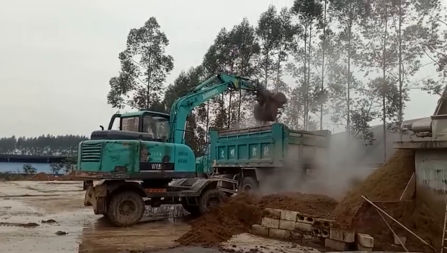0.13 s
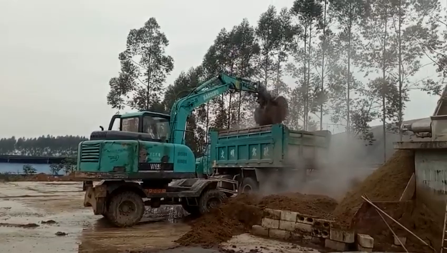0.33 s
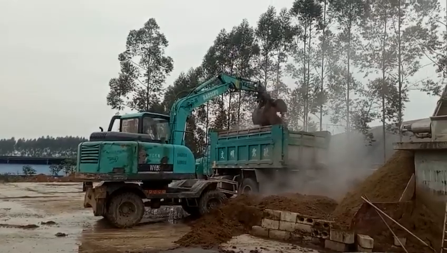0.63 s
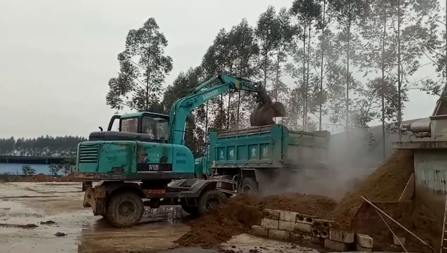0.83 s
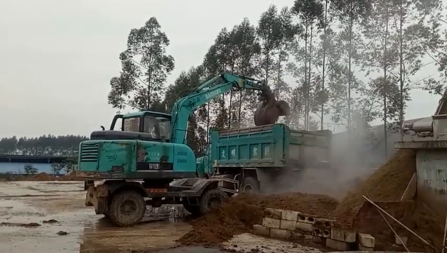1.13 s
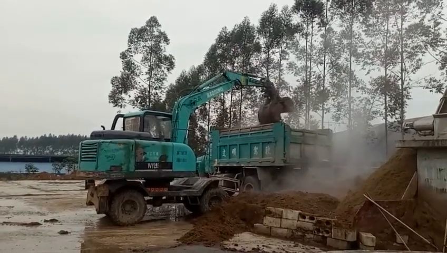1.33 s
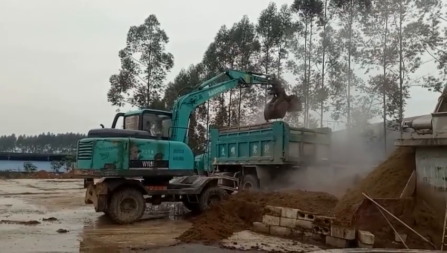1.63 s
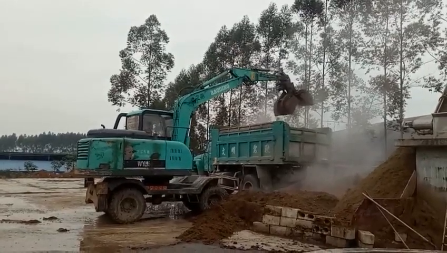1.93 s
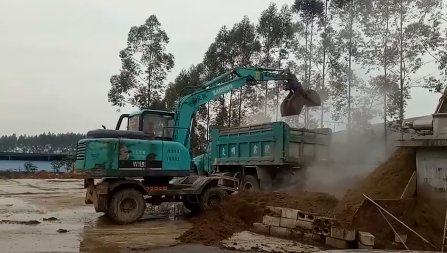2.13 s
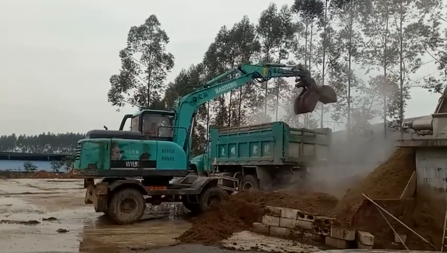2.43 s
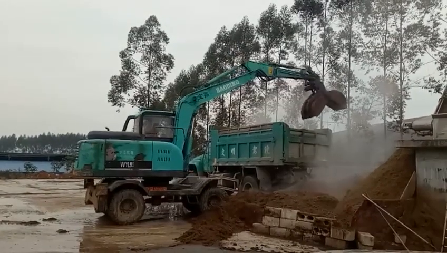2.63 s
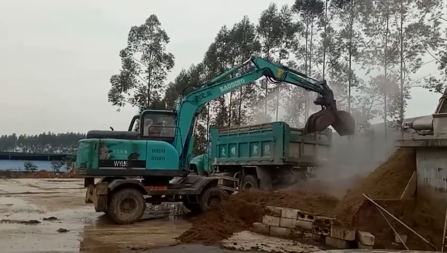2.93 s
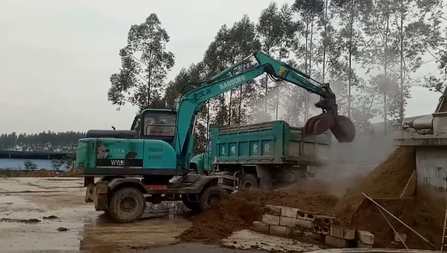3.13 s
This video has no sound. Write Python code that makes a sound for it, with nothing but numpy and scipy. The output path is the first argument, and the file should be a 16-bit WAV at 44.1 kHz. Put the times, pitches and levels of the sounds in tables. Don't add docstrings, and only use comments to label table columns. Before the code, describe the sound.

Steady excavator diesel clatter and low rumble outdoors, heard on a phone from about twenty metres. Pitch sags slightly under load after an early clank, rises again past two seconds, then the grab clanks.

```python
import sys
import numpy as np
from scipy import signal
from scipy.fft import rfft, irfft
from scipy.io import wavfile
from scipy.ndimage import uniform_filter1d

SR = 44100
rng = np.random.default_rng(int(sys.argv[2]) if len(sys.argv) > 2 else 0)


def gain_from_db(level_db):
    decades = np.asarray(level_db, float) / 20
    return 10 ** decades


def transcribe(signal):
    frames = np.atleast_2d(signal).T
    limited = np.clip(frames, -1, 1)
    pcm = np.round(limited * 32767).astype(np.int16)
    wavfile.write(sys.argv[1], SR, pcm)


N = 145530
t = np.arange(N) / SR
f = np.maximum(np.fft.rfftfreq(N, 1 / SR), 1)

# time in seconds, engine cycles per second above the loaded speed in Hz,
# hydraulic load 0-1, pump stroke in dB.
WORK = [(0, .5, 0, 0.5), (0.282, 0.91, 0.47, -1), (.36, .1, 0.7, -4), (.42, 0.022, 0.99, -1.5),
        (1.097, 0.0015, 0.92, -0.5), (1.45, 0.00081, 0.89, -1.5), (2.031, 0.0046, 1, -4.5),
        (2.199, 0.56, 0, -2.5), (2.698, .82, 0.22, 4), (2.801, .6, 0, -17), (2.971, 0.74, 0.06, -9.5),
        (3.15, 0.96, 0, 3), (3.3, 0.9, 0.7, -0.5)]
LOADED_HZ = 12.172

EXHAUST_ORDERS = [4, 8, 9, 10, 12, 13, 14, 15, 16, 17, 19, 20, 21, 22, 23, 24, 25, 26, 28, 30, 32, 34, 42,
                  48, 60]
# level idle in dB, level loaded in dB.
EXHAUST_LEVELS = [(-47, -45), (-34, -35), (-35, -34), (-36, -43), (-45, -39), (-46, -39), (-48, -48),
                  (-46, -40), (-35, -50), (-46, -43), (-39, -42), (-35, -38), (-46, -46), (-38, -50),
                  (-38, -40), (-45, -31), (-45, -31), (-39, -46), (-40, -50), (-46, -40), (-39, -42),
                  (-48, -44), (-48, -42), (-48, -41), (-48, -40)]
FAN_ORDER, FAN_IDLE_DB, FAN_LOADED_DB = 10.36, -25, -31

GEAR_ORDERS = [80, 84, 85, 86, 87, 88, 90, 91, 92, 93, 97, 99]
# level idle in dB, level loaded in dB.
GEAR_LEVELS = [(-41, -44), (-42, -52), (-50, -42), (-40, -50), (-38, -41), (-36, -50), (-50, -34),
               (-50, -44), (-50, -32.5), (-50, -48), (-50, -41), (-50, -42)]

PUMP_ORDERS = [18, 36, 54]
# level idle in dB, level loaded in dB.
PUMP_LEVELS = [(-27, -27), (-42, -36), (-46, -32)]
# time in seconds, second pump harmonic in dB,
# third pump harmonic in dB, gear mesh in dB.
VALVE_MOVES = [(0, 0, 0, 0), (.28, 0, 0, 0), (.33, 7, 0, 0), (.45, 1, 1, 1), (.8, -1, 0, 1),
               (1.0, -5, 2, 0), (1.12, -7, -9, 1), (1.42, -8, -6, 1), (1.52, 1, -2, -7), (1.8, 1, -7, -7),
               (2.05, 3, -6, -7), (2.2, 0, 0, 0), (3.3, 0, 0, 0)]
WAVER_DB, WAVER_PER_S = 1.2, 6

# place in the cycle 0-1, level in dB.
BLOWS = [
    (.24, 12.5),
    (.43, 9),
    (0.499, 11),
    (.73, 8),
    (.84, 10.5),
    (.97, 7.5),
    (0.081, 4.5),
    (.6, 4),
]
# frequency in Hz, width in Hz, level in dB.
BLOCK_MODES = [(806, 99, -13.5), (972, 40, -11), (1030, 70, -8.5), (1111, 110, -5), (1203, 89, -3.5),
               (1310, 270, -10), (1650, 60, -9), (2080, 133, -9), (4400, 400, -10.5)]
KNOCK_DB, KNOCK_SCATTER_DB, KNOCK_JITTER_S = -27.5, 1.2, .00005

# frequency in Hz, level in dB.
RATTLE_TONE = [(600, -8), (830, -10), (1150, -3), (1800, -7), (2300, -9), (3300, -14.5), (4500, -12),
               (6500, -31), (9000, -46)]
RATTLE_DB, RATTLE_FLICKER_DB = -21.5, .8
PULSE_DEPTH, PULSE_DECAY_S = .22, .014

# frequency in Hz, level in dB.
RUMBLE_TONE = [(15, -56), (25, -16), (54, -20), (119, 4), (173, -5), (227, -3.5), (487, -11.5), (657, -8),
               (900, -15.5), (1170, -37), (1980, -120)]
RUMBLE_DB, RUMBLE_FLICKER_DB = -24, 1.

# frequency in Hz, level in dB.
HISS_TONE = [(7000, -19), (7600, -26), (8200, -1.5), (11200, -4.5), (13100, 0.5), (14000, 2.5), (14800, -1),
             (15200, -17)]
HISS_DB, HISS_FLICKER_DB, HISS_LOAD_DB = -58, 3.5, 2.5

WIDE_OCT, NARROW_OCT = .7, .07
SWELL_DB, WALK_SPREAD = .3, 1.4
BYPASS_HZ, BYPASS_WIDTH_HZ, BYPASS_DB = 1614, 71, -33.5

# start in seconds, level in dB, centre in Hz, width in Hz, decay in seconds.
CLANKS = [(.1872, -9.5, 3720, 700, 0.0046), (.1885, -11, 4670, 900, .007),
          (0.1871, -2.5, 1120, 900, 0.0021), (0.189, -13, 2290, 400, 0.0054),
          (0.197, -14.5, 4250, 1500, .007), (.197, -15, 2200, 700, 0.0068), (.204, -20, 4200, 1200, 0.0067),
          (0.235, -19, 3750, 2000, 0.0073), (0.242, -14, 2490, 400, 0.0053),
          (.2445, -20, 3800, 900, 0.0083), (0.251, -16, 2530, 700, 0.0075), (0.261, -17, 2480, 500, 0.0045),
          (.275, -19, 2200, 2500, 0.0027), (.279, -20, 3650, 500, 0.01), (0.361, -20, 4200, 1400, 0.011),
          (2.698, -18, 1840, 700, 0.0098), (2.710, -24, 4700, 1200, 0.0055),
          (2.719, -16.5, 1700, 600, .006), (2.763, -17, 2000, 1200, .005),
          (2.7794, -15.5, 4150, 1980, 0.0047), (2.7825, -10.5, 3370, 1400, 0.0043),
          (2.779, -9, 930, 400, 0.005), (2.78, -14.5, 2000, 1400, .004), (2.792, -18, 4300, 2000, 0.0031),
          (2.801, -22, 1600, 700, .003), (2.8165, -26, 2800, 1800, .004), (2.837, -20, 4730, 1300, 0.0087),
          (2.839, -19, 2620, 1600, 0.01), (2.8392, -13.5, 1190, 1000, 0.0048),
          (2.848, -22, 4000, 1800, .009), (2.859, -32, 1490, 700, 0.0049), (2.77, -23.5, 566, 260, 0.045),
          (2.85, -17.5, 636, 405, 0.047), (2.89, -19, 2000, 1000, .006), (2.92, -19.5, 670, 300, 0.0088),
          (3.284, -25, 4030, 2000, 0.0066)]
CLANK_RISE_S, CLANK_ALIKE = .0006, 0.35
CLANK_LEFT_DB, CLANK_RIGHT_DB = 4.5, -8

# frequency in Hz, likeness 0-1.
PORT_LIKENESS = [(100, .98), (500, .88), (1200, .74), (2000, .45), (3200, .27), (4500, .35), (8000, .1)]
# frequency in Hz, left minus right in dB.
PORT_BALANCE = [(60, 0.5), (110, 9), (200, 8), (380, 7), (700, 5), (1290, 6.0), (2380, 6.5), (4400, 6.5),
                (8120, 2.5), (15000, 14)]
RIGHT_LAG_S, MIC_TOP_HZ = 0.00014, 7270
LIMIT_DB, RELEASE_S, DUCK = -12, .015, 34.


def curve(points, hz):
    p = np.array(points, float)
    return np.interp(np.log(hz), np.log(p[:, 0]), p[:, 1])


def level(x, db):
    return x * gain_from_db(db) / np.sqrt(np.mean(x ** 2))


def walk(rate):
    k = int(SR / rate)
    steps = rng.standard_normal(N // k + 2)
    path = np.interp(np.arange(N) / k, np.arange(len(steps)), steps)
    return WALK_SPREAD * uniform_filter1d(path, k)


def ring(x, hz, width_hz):
    return signal.lfilter(*signal.iirpeak(hz, hz / width_hz, SR), x)


def noise(points, db, flicker_db, octaves):
    spec = rfft(rng.standard_normal((2, N))) * gain_from_db(curve(points, f))
    low_hz, high_hz = points[0][0], points[-1][0]
    centres = low_hz * 2 ** np.arange(0, np.log2(high_hz / low_hz) + octaves / 2, octaves)
    out, swell = 0, SWELL_DB * walk(1.85)
    for hz in centres:
        share = np.cos(np.pi / 2 * np.clip(np.log2(f / hz) / octaves, -1, 1)) ** 2
        out = out + irfft(spec * share, N) * gain_from_db(swell + flicker_db * walk(16))
    return level(out, db)


def lines(orders, levels, turns, load):
    out = []
    for order, (idle_db, loaded_db) in zip(orders, levels):
        db = idle_db + (loaded_db - idle_db) * load + WAVER_DB * walk(WAVER_PER_S)
        phase = 2 * np.pi * (order * turns + rng.random())
        out.append(np.sqrt(2) * gain_from_db(db) * np.sin(phase))
    return np.array(out)


def valve_moves():
    s, *trims = np.array(VALVE_MOVES).T
    return [np.interp(t, s, trim) for trim in trims]


def exhaust(turns, load):
    return lines(EXHAUST_ORDERS, EXHAUST_LEVELS, turns, load).sum(0)


def fan(turns, load):
    return lines([FAN_ORDER], [(FAN_IDLE_DB, FAN_LOADED_DB)], turns, load).sum(0)


def gears(turns, load, mesh_db):
    return lines(GEAR_ORDERS, GEAR_LEVELS, turns, load).sum(0) * gain_from_db(mesh_db)


def pump(turns, load, stroke_db, second_db, third_db):
    pulses = lines(PUMP_ORDERS, PUMP_LEVELS, turns, load)
    return (pulses * gain_from_db(np.array([stroke_db, second_db, third_db]))).sum(0)


def knocks(turns):
    place, db = np.array(BLOWS).T
    at = np.arange(50)[:, None] + place
    jitter, scatter = rng.standard_normal((2, *at.shape))
    seconds = np.interp(at, turns, t, right=t[-1]) + KNOCK_JITTER_S * jitter
    i = (seconds * SR).astype(int)
    x = np.zeros(N)
    x[np.clip(i, 0, N - 1)] = gain_from_db(db + KNOCK_SCATTER_DB * scatter)
    return x


def block(blows):
    out = 0
    for k, (hz, width_hz, db) in enumerate(BLOCK_MODES):
        out = out + (-1) ** k * gain_from_db(db) * ring(blows, hz, width_hz) / np.sqrt(width_hz)
    return level(out, KNOCK_DB)


def rattle(blows):
    puff = signal.lfilter([1], [1, -np.exp(-1 / (PULSE_DECAY_S * SR))], blows)
    puff = uniform_filter1d(puff, SR // 500)
    pulse = 1 - PULSE_DEPTH + PULSE_DEPTH * puff / puff.mean()
    return noise(RATTLE_TONE, RATTLE_DB, RATTLE_FLICKER_DB, WIDE_OCT) * pulse


def rumble():
    return noise(RUMBLE_TONE, RUMBLE_DB, RUMBLE_FLICKER_DB, WIDE_OCT)


def hiss(load):
    air = noise(HISS_TONE, HISS_DB, HISS_FLICKER_DB, NARROW_OCT)
    return air * gain_from_db(HISS_LOAD_DB * load)


def bypass(load):
    jet = rng.standard_normal(N)
    for _ in range(2):
        jet = ring(jet, BYPASS_HZ, BYPASS_WIDTH_HZ)
    return level(jet, BYPASS_DB) * (1 - load)


def clanks():
    out, u = np.zeros((2, N)), t[:SR // 12]
    sides = gain_from_db(np.array([[CLANK_LEFT_DB], [CLANK_RIGHT_DB]]))
    for s, db, hz, width_hz, decay_s in CLANKS:
        crack = rng.standard_normal((2, len(u)))
        crack[1] = CLANK_ALIKE * crack[0] + np.sqrt(1 - CLANK_ALIKE ** 2) * crack[1]
        edges = [hz - width_hz / 2, hz + width_hz / 2]
        plates = signal.sosfilt(signal.butter(3, edges, "band", fs=SR, output="sos"), crack)
        shape = np.exp(-u / decay_s) * np.minimum(u / CLANK_RISE_S, 1)
        hit = plates * shape
        hit = hit * np.sqrt(np.sum(shape ** 2) / np.sum(hit ** 2, axis=1, keepdims=True))
        hit = hit * gain_from_db(db - 6.5) * sides
        i = int(s * SR)
        out[:, i:i + len(u)] += hit[:, :N - i]
    return out


def dull(x):
    return signal.sosfilt(signal.butter(8, MIC_TOP_HZ, fs=SR, output="sos"), x)


def ports(direct, around):
    pad = SR // 10
    direct_wide, around_wide = np.pad([direct, around], ((0, 0), (pad, pad)), mode="reflect")
    hz = np.maximum(np.fft.rfftfreq(len(direct_wide), 1 / SR), 1)
    alike = np.clip(curve(PORT_LIKENESS, hz), 0, .999)
    late = rfft(direct_wide) * np.exp(-2j * np.pi * hz * RIGHT_LAG_S)
    right = alike * late + np.sqrt(1 - alike ** 2) * rfft(around_wide)
    right = irfft(right * gain_from_db(-curve(PORT_BALANCE, hz)), len(direct_wide))
    return np.array([direct, right[pad:pad + N]])


def scene():
    s, *moves = np.array(WORK).T
    extra_hz, load, stroke_db = (np.interp(t, s, move) for move in moves)
    turns = np.cumsum(LOADED_HZ + extra_hz) / SR
    second_db, third_db, mesh_db = valve_moves()
    blows = knocks(turns)
    machine = exhaust(turns, load) + fan(turns, load) + gears(turns, load, mesh_db)
    machine = machine + pump(turns, load, stroke_db, second_db, third_db)
    machine = machine + block(blows) + bypass(load)
    bed = rumble() + rattle(blows)
    air = hiss(load)
    direct = dull(bed[0] + machine) + air[0]
    around = dull(bed[1] + np.roll(machine, SR // 70)) + air[1]
    return ports(direct, around) + dull(clanks())


def top_cut(x):
    return signal.sosfilt(signal.butter(12, 15170, fs=SR, output="sos"), x)


def record(dry):
    loudness = uniform_filter1d(np.abs(dry[0]), SR // 300)
    over = np.maximum(loudness - gain_from_db(LIMIT_DB), 0)
    fall = np.exp(-1 / (RELEASE_S * SR))
    duck = signal.lfilter([(1 - fall) ** 2], [1, -2 * fall, fall ** 2], over)
    mix = dry / (1 + DUCK * duck)
    return top_cut(mix)


dry = scene()
out = record(dry)
transcribe(out)
```